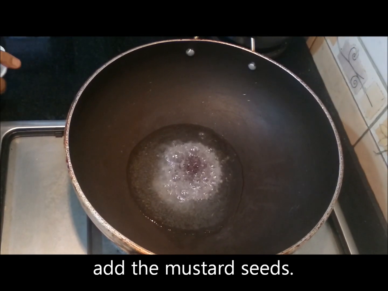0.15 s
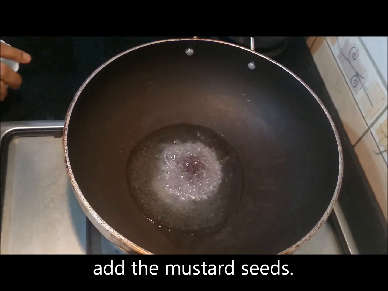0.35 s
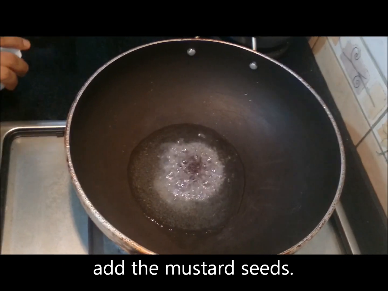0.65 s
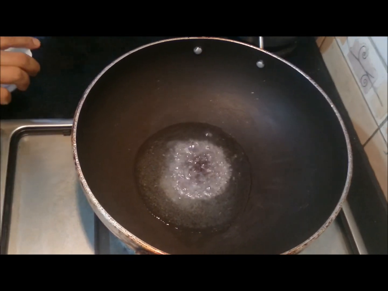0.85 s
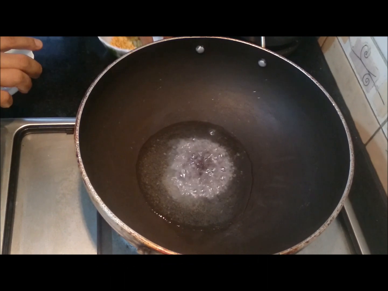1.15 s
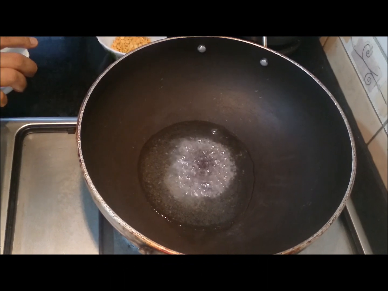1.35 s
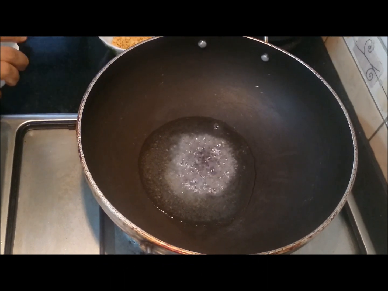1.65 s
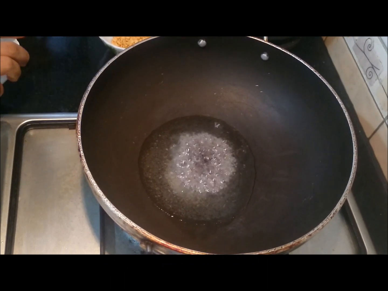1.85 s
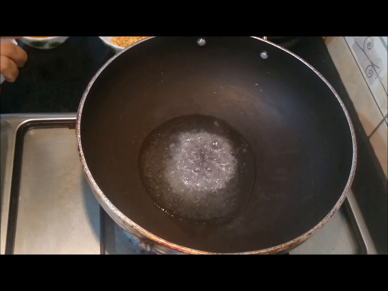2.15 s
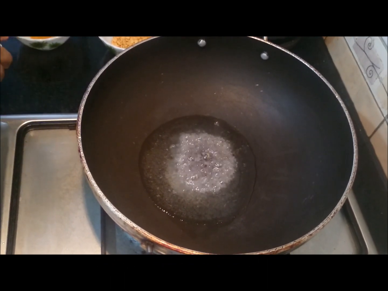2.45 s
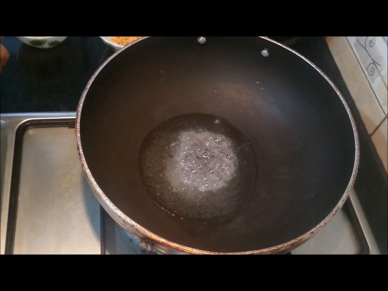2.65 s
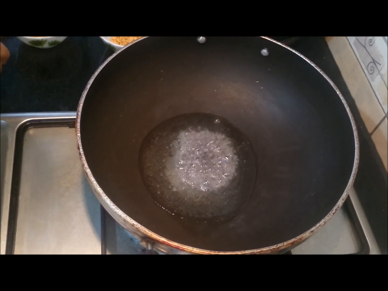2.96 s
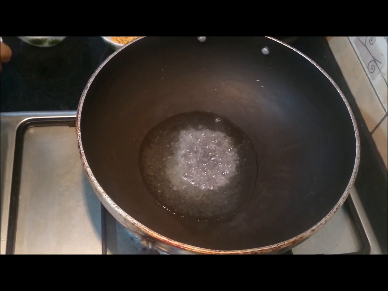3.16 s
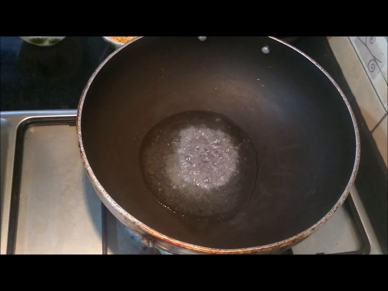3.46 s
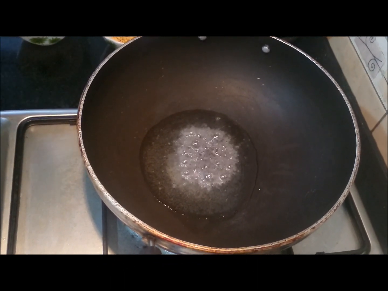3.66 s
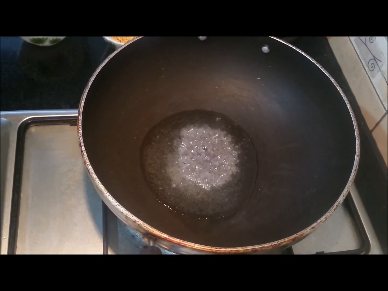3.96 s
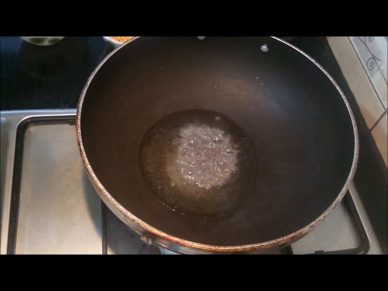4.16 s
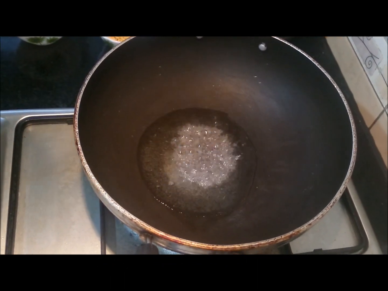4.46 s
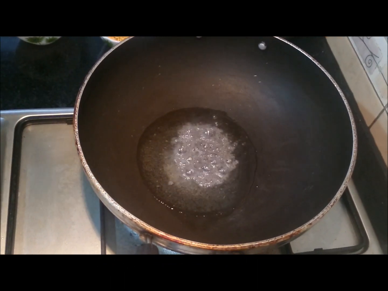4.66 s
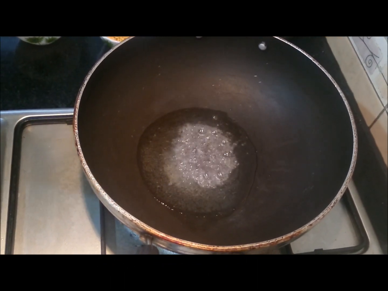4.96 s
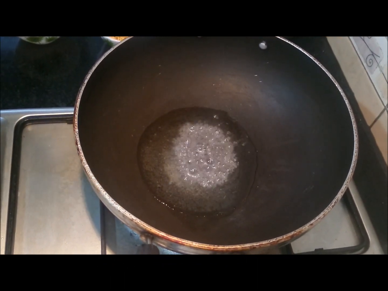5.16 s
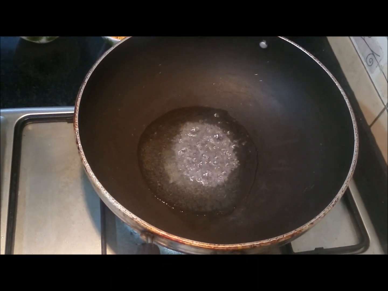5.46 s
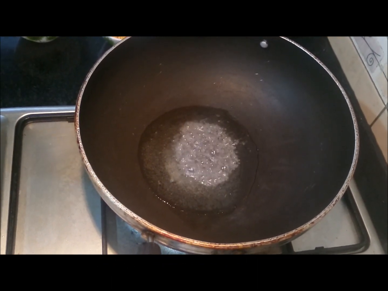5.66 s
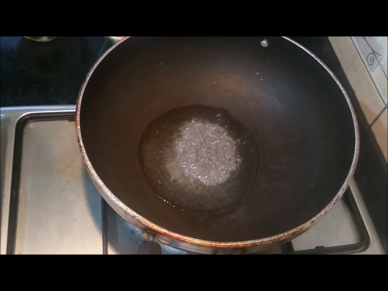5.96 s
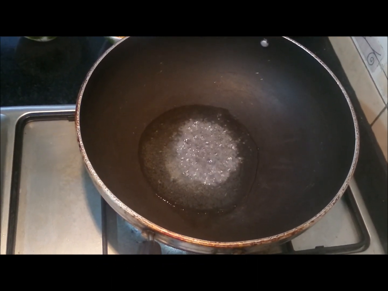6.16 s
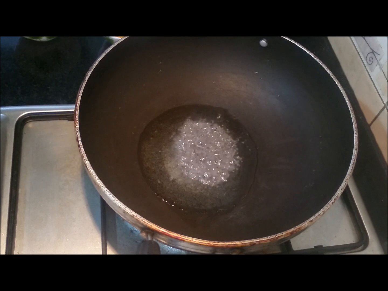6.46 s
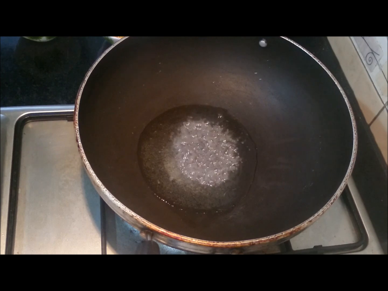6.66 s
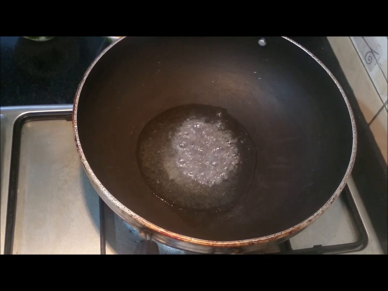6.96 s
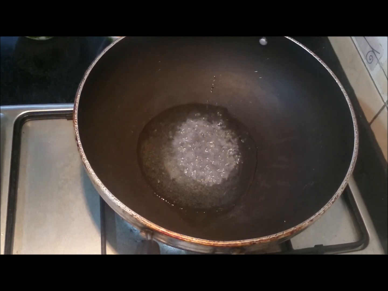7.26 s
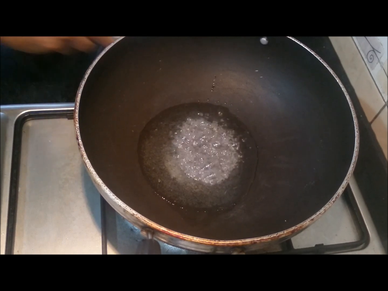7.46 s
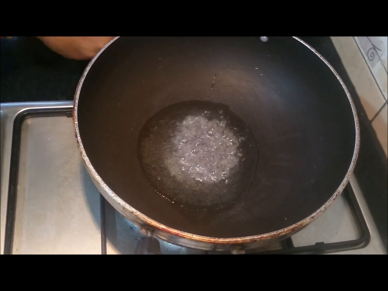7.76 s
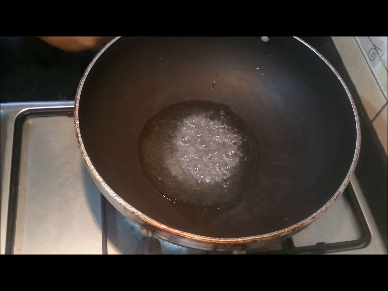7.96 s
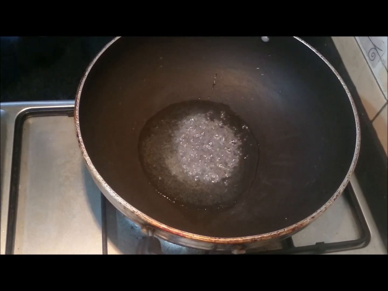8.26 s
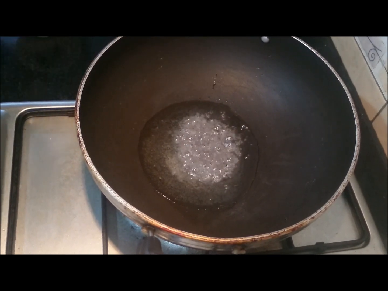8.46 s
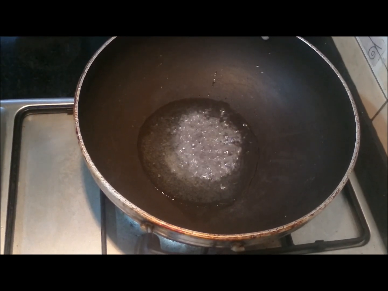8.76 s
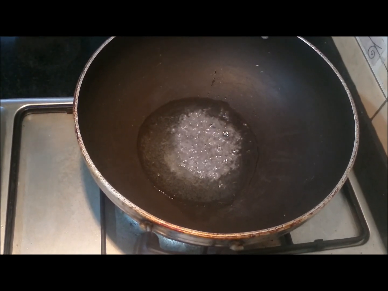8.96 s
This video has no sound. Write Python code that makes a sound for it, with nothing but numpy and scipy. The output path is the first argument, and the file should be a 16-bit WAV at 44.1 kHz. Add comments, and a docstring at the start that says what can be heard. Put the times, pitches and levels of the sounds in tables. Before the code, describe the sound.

A fine, even sizzle of hot oil runs throughout, over a very quiet, low gas-burner rumble. From 0 to 3 s mustard seeds pop only now and then, mostly soft, with stronger ones near 1.2 and 2.3 s. Fingers rub the hand-held camera around 0.7-1.4 s, 1.8-2.2 s and 2.6-3.5 s, the last slip sharpest, near 3.2 s, with a tiny squeak; hand shifts thud dully. At 3.5-3.8 s a cluster of crisp cracks arrives. A hard, bright double pop at about 4.4 s spits a brief hiss of boiling droplets. From 5 s pops come rapidly, with another hard snap at 5.4 s, each rattling round the ringing steel bowl with a short kitchen echo. Around 7.2-7.8 s they are strong and frequent; the sizzle rises, small bubbles plink between, and by 8.6-9 s the popping is nearly continuous and the frying loudest.

```python
"""A soft, even sizzle in a wok of hot oil, and mustard-seed pops that come faster and harder, each rattling round the bowl.
Pops are resonant noise bursts with rising plinks, cracks and thuds; sizzle is dense random ticks plus hiss.
Cracks throw hissing droplets, and small bubbles plink between the pops; steel modes ring after all of these.
A gas burner murmurs as shaped noise. Early on fingers rub a hand-held camera (swelling and jolting noise),
the hand's shifts rumble dully, and its two microphones colour the sound differently."""
import sys
import numpy as np
from scipy import signal
from scipy.fft import rfft, irfft, next_fast_len
from scipy.io import wavfile
from scipy.ndimage import map_coordinates

SR = 44100
rng = np.random.default_rng(int(sys.argv[2]) if len(sys.argv) > 2 else 0)


def pcm_store(signal):
    """Save signal as 16-bit PCM."""
    levels = np.round(np.clip(np.atleast_2d(signal), -1, 1) * 32767)
    wavfile.write(sys.argv[1], SR, levels.astype(np.int16).T)


N = 402191

# seeds that burst loudly: t/s, ring level before trim/dB, ring pitch/Hz, ring sharpness Q, crack level before trim/dB
SEED_POPS = [(0.136, -45, 2530, 1.9, -52), (0.237, -31, 4600, 11, -57), (0.256, -30, 3220, 0.64, -58),
             (0.482, -44.5, 6500, 3.6, -48), (0.756, -36.5, 2780, 0.85, -43.5),
             (0.905, -41, 6740, 1.8, -61), (0.964, -38.5, 4710, 3.6, -59), (1.193, -22, 5000, 2.2, -60),
             (1.476, -48, 5150, 7.9, -60), (1.564, -38.5, 4380, 5.6, -47), (1.979, -33.5, 3530, 1.3, -47),
             (2.284, -19, 6650, .9, -50), (2.367, -31, 4830, 2.7, -43), (2.398, -40.5, 5400, 1.6, -43),
             (2.556, -39, 7170, 1.3, -70), (2.895, -34, 6400, 0.63, -61), (3.193, -36.5, 7840, 3.6, -63),
             (3.418, -43, 4340, 1.8, -67), (3.5163, -30, 2990, 1.6, -20), (3.586, -21.5, 11800, 1.4, -22),
             (3.690, -31.5, 2790, 1.5, -27), (3.722, -31.5, 4350, 3.6, -59), (3.815, -24, 3770, 2.5, -19),
             (4.181, -27.5, 4500, 1.9, -39), (4.374, -13, 12060, 2.4, -19.5), (4.391, -34, 2640, 1.3, -44),
             (4.425, -42, 10800, 1.3, -15.5), (4.597, -32, 3900, 1.6, -53), (4.8631, -50, 3800, 12, -29.5),
             (4.966, -45, 4700, 4.6, -49), (5.006, -31.5, 9400, 2.2, -30.5), (5.111, -30, 6200, 1.7, -50),
             (5.158, -21, 4770, 1.8, -53), (5.212, -28.5, 3090, 3, -39), (5.277, -29.5, 3800, 2.1, -36),
             (5.327, -22, 4920, 2.6, -48), (5.374, -14, 11950, 1.7, -14.5), (5.404, -35, 5750, 1.2, -50),
             (5.678, -29, 5180, 10, -17.5), (5.725, -27, 4940, 1.24, -38), (5.962, -36.5, 5140, 6.4, -50),
             (5.979, -27.5, 5440, 0.37, -51), (6.038, -20, 4170, 1.26, -52),
             (6.129, -24.5, 3440, 3.1, -26.5), (6.152, -32, 8650, 11, -17.5), (6.209, -18, 6040, 0.58, -45),
             (6.256, -28, 2970, 1.5, -36), (6.452, -32.5, 2900, 0.95, -59), (6.572, -29.5, 4400, 2.1, -55),
             (6.639, -23.5, 7400, 0.52, -53), (6.735, -30.5, 3980, 2.2, -38), (6.761, -33, 8410, 0.91, -62),
             (6.875, -31.5, 3600, 0.83, -33.5), (6.978, -33.5, 3870, .7, -62),
             (7.050, -23.5, 5560, 1.1, -25), (7.2247, -27.5, 4200, 3, -33), (7.229, -38, 3830, 2.4, -21),
             (7.289, -19.5, 4330, 5.4, -14.5), (7.444, -23.5, 5370, 0.76, -53),
             (7.475, -30, 5240, 5.9, -50), (7.55, -22, 5700, 0.75, -41), (7.613, -34.5, 2850, 2.8, -49),
             (7.6438, -20, 4240, 1.5, -27), (7.651, -21, 4460, 0.68, -24), (7.699, -28.5, 4430, 1.6, -55),
             (7.780, -31.5, 4140, .7, -57), (7.801, -33, 7400, 9.2, -22), (7.890, -23.5, 4130, 0.7, -49),
             (7.942, -24, 4000, 1.37, -49), (8.001, -37, 3770, 2.3, -27.5), (8.127, -21.5, 3230, 1.5, -21),
             (8.193, -29, 4300, 0.38, -51), (8.220, -28.5, 3060, 0.36, -53), (8.351, -29, 5560, 0.97, -44),
             (8.374, -26, 5600, .85, -52), (8.587, -28, 4700, 3.1, -20), (8.6175, -29.5, 4210, 7, -50),
             (8.650, -18, 4340, 1.2, -27), (8.662, -43, 4460, 2, -21.5), (8.7318, -30, 2800, 0.61, -55),
             (8.756, -27, 4040, 2, -56), (8.766, -30, 4500, 0.92, -52), (8.774, -25.5, 4180, 0.88, -55),
             (8.784, -15.5, 6200, 0.83, -50), (8.825, -26.5, 5010, 0.71, -25),
             (8.861, -25.5, 3220, 1.55, -31), (8.897, -33, 4910, 4.3, -58), (8.938, -21, 3730, 2.8, -28),
             (8.984, -35.5, 2600, 3.7, -41), (9.007, -27.5, 3400, 1.8, -23)]
# foam activity, sinking early on, then rising as the seeds heat up: t/s, level before trim/dB
FOAM_LEVEL = [(0, -42.5), (0.5, -47.5), (4.1, -48), (6.5, -45.5), (7.7, -41), (8.1, -42), (8.76, -37.5),
              (9.12, -41)]
# spectrum of the frying hiss: f/Hz, relative density/dB per Hz
FRYING_SPECTRUM = [(900, -30.5), (1900, -10), (3200, -2.5), (4500, 0), (5500, 0.5), (7500, -2), (10000, -4),
                   (15500, -7.5)]


def amp(db):
    """dB to amplitude ratio."""
    return 10 ** (np.asarray(db) / 20)


def unit(x):
    """x scaled to rms 1."""
    return x / np.sqrt(np.mean(x ** 2) + 1e-20)


def along(points, hz):
    """(f/Hz, value) points interpolated on a log-frequency axis."""
    f, v = np.transpose(points)
    return np.interp(np.log(hz + 1), np.log(f + 1), v)


def curve(rows):
    """(t/s, value) rows interpolated to one value per sample."""
    return np.interp(np.arange(N) / SR, *np.transpose(rows))


def wobble(rate_hz):
    """Smooth random curve with rate_hz knots a second."""
    knots = rng.standard_normal(int(N * rate_hz / SR) + 4)
    return map_coordinates(knots, [np.arange(N) * rate_hz / SR])


def fade(t, t60_s):
    """Amplitude falling 60 dB in t60_s."""
    return np.exp(-np.log(1000) * t / t60_s)


def filtered(x, response):
    """x times a complex response of frequency."""
    n = x.shape[-1]
    padded = next_fast_len(n + 4096)
    f = np.fft.rfftfreq(padded, 1 / SR)
    return irfft(rfft(x, padded) * response(f), padded)[..., :n]


def resonance(f, hz, q):
    """Causal band-pass with steep skirts: one resonator applied twice."""
    single = 1j * f * hz / q / (hz * hz - f * f + 1j * f * hz / q)
    return single ** 2


def coloured(x, points):
    """x with the given gain curve over frequency, at rms 1."""
    return unit(filtered(x, lambda f: amp(along(points, f))))


def add(track, start_s, sound):
    """Mix a sound into the track at start_s."""
    part = track[:, max(round(start_s * SR), 0):][:, :sound.shape[1]]
    part += sound[:, :part.shape[1]]


def swells(rows):
    """Amplitude with one smooth arch per (start/s, length/s, level/dB) row."""
    t = np.arange(N) / SR
    return sum(amp(db) * np.sin(np.pi * np.clip((t - s) / length, 0, 1)) ** 2 for s, length, db in rows)


def jolts(rows, t60_s):
    """Amplitude that jumps up and decays for each (t/s, level/dB) row."""
    kicks = np.zeros(N)
    for s, db in rows:
        kicks[round(s * SR)] += amp(db)
    return signal.lfilter([1], [1, -fade(1 / SR, t60_s)], kicks)


def kitchen(rise_s=0.0027):
    """Room response at two microphones: noise whose frequencies decay at different speeds."""
    # reverberation: f/Hz, t60/s
    room_t60 = [(300, 0.87), (2000, 0.4), (5500, 0.46), (9000, 0.37), (15000, 0.25)]
    size = SR * 2 // 5
    hz, age, z = signal.stft(rng.standard_normal((2, size)), SR, nperseg=256)
    decayed = z * fade(age, along(room_t60, hz)[:, None])
    tail = signal.istft(decayed, SR, nperseg=256)[1][:, :size]
    return tail * (1 - np.exp(-np.arange(size) / SR / rise_s))


def echoes(room, rise_s, burst_t60_s, wok_db, wok_t60_s, room_db, shared, spiky=0.45):
    """A burst as each microphone hears it: blast, rattle round the bowl, then room."""
    t = np.arange(SR // 12) / SR
    shared = np.clip(shared, 0, 1)  # power fraction of the blast common to both microphones
    common = np.sqrt(shared) * rng.standard_normal(len(t))
    blast = common + np.sqrt(1 - shared) * rng.standard_normal((2, len(t)))
    rattle = amp(wok_db) * rng.standard_normal((2, len(t))) * fade(t, wok_t60_s)
    near = blast * fade(t, burst_t60_s) + rattle
    # the curved wall focuses some reflections and scatters others
    knots = t[::SR // 1500]
    focus = np.interp(t, knots, np.clip(rng.standard_normal(len(knots)), -2, 2))
    near *= np.exp(spiky * (focus - spiky / 2))
    path = amp(room_db) * room
    add(path, 0, near * (1 - np.exp(-t / rise_s)))
    return path


def burst(path, hz, q):
    """The path through one resonance, with the energy of 10 ms at rms 1."""
    x = filtered(path, lambda f: resonance(f, hz, max(q, .2)))
    return x * np.sqrt(SR / 100 / np.sum(x ** 2, axis=1, keepdims=True))


def sizzle(level_db=-1.5, rate_hz=900, spread_db=5, hiss_db=-3, spots=5):
    """Hundreds of tiny foam bubbles burst each second, over the hiss of those too small to tell apart."""
    sizes_db = spread_db * np.minimum(rng.exponential(size=N), 4)
    ticks = (rng.random(N) < rate_hz / SR) * amp(sizes_db)
    spot = rng.integers(0, spots, N)
    crackle = np.zeros((2, N))
    for k in np.unique(spot):  # each spot of foam has its own path to the microphones
        path = echoes(kitchen(), rise_s=0.0012, burst_t60_s=0.013, wok_db=-5.5, wok_t60_s=0.1,
                      room_db=-18.0, shared=0.76)
        crackle += signal.fftconvolve((ticks * (spot == k))[None], path, axes=1)[:, :N]
    foam = unit(crackle) + amp(hiss_db) * rng.standard_normal((2, N))
    waver_db = .6 * wobble(9)
    return amp(level_db + curve(FOAM_LEVEL) + waver_db) * coloured(foam, FRYING_SPECTRUM)


def burner(level_db=-57, drone_db=-68, drone_hz=94, flame_db=-63, flame_hz=850, flame_q=7.1):
    """The gas flame rumbles, with a low drone and a hollow resonant rush under the wok."""
    # rumble spectrum: f/Hz, relative density/dB per Hz
    rumble_spectrum = [(12, -86), (20, 2), (32, -29), (92, -12.5), (129, -24), (230, -17.5), (330, -24),
                       (493, -18), (627, -19.5), (847, -17), (994, -22.5), (1120, -23), (1260, -26.5),
                       (1430, -21.5), (2400, -85), (3120, -71), (5280, -120)]
    # left-right correlation: f/Hz, likeness (0 to 1)
    likeness = [(30, 0.051), (60, 0.17), (130, 0.85), (290, 0.66), (640, 0.47), (1400, 0.17)]
    a, b, c = rng.standard_normal((3, N))

    def turn(f):
        """Mid/side mixing angle that gives the likeness."""
        return np.arccos(np.clip(along(likeness, f), -1, 1)) / 2

    mid = filtered(a, lambda f: np.cos(turn(f)))
    side = filtered(b, lambda f: np.sin(turn(f)))
    flutter_db = .8 * wobble(8)
    rumble = coloured(np.array([mid + side, mid - side]), rumble_spectrum) * amp(flutter_db)
    drone = unit(filtered(c, lambda f: resonance(f, drone_hz, 2.8)))
    rush = unit(filtered(rng.standard_normal((2, N)), lambda f: resonance(f, flame_hz, flame_q)))
    return amp(level_db) * rumble + amp(drone_db) * drone + amp(flame_db) * rush


def grip(level_db=-2, tremor_db=-65, tremor_swing_db=4):
    """Hand shifts and a continuous slight tremor reach the microphones as a dull rumble."""
    # hand shifts: start/s, length/s, peak level before trim/dB
    hand_shifts = [(0.24, 0.41, -57.5), (0.68, 0.16, -49.5), (4.34, 0.47, -55), (7.5, 0.44, -50)]
    noise = rng.standard_normal(N) + .5 * rng.standard_normal((2, N))
    tremor = amp(tremor_db + tremor_swing_db * wobble(5))
    motion = amp(level_db) * swells(hand_shifts) + tremor
    # f/Hz, relative density/dB per Hz
    return motion * coloured(noise, [(10, 4.5), (30, 1), (55, -5), (170, -14.5), (400, -30), (1000, -70)])


def blips(level_db=-2, grows=1.7, spread_db=2.5, pitch_hz=5200, scatter=0.3, q=4, count=40):
    """Small bubbles plink between the pops: denser towards the end, louder when the foam is louder."""
    track, heat_db = np.zeros((2, N)), curve(FOAM_LEVEL)
    plink_db = level_db + heat_db.min() + grows * (heat_db - heat_db.min())
    draws = np.clip(rng.standard_normal((count, 2)), -2, 2)
    for place, (size, pitch) in zip(rng.random(count), draws):
        at = int(np.cbrt(place) * (N - 1))  # the cube root crowds them late
        path = echoes(kitchen(), rise_s=0.0014, burst_t60_s=0.015, wok_db=-23, wok_t60_s=.07,
                      room_db=-31, shared=0.75)
        blip = burst(path, pitch_hz * np.exp(scatter * pitch), q)
        add(track, at / SR, amp(plink_db[at] + spread_db * size) * blip)
    return track


def plink(hz, q, rise_s=0.0015, t60_s=0.014, climb=0.29, climb_s=0.0026):
    """A closing bubble's short rising note; the sharper the pop's ring, the louder it is."""
    t = np.arange(SR // 25) / SR
    pitch_hz = hz * np.exp(climb * (.5 - np.exp(-t / climb_s)))
    tone = np.sin(2 * np.pi * np.cumsum(pitch_hz) / SR)
    note = tone * (1 - np.exp(-t / rise_s)) * fade(t, t60_s)
    # energy of 10 ms at rms 1, before the sharpness weight
    return q / (q + 1) * note * np.sqrt(SR / 100 / np.sum(note ** 2))


def push(path, width_s=0.000095, rebound=0.98, echo_db=-24):
    """A pressure pulse, weaker suction and faint echoes, at rms 1 over the first 10 ms."""
    u = np.arange(SR // 100) / SR / width_s
    pulse = (1 - rebound * u) * np.exp(-u)
    heard = amp(echo_db) * path
    heard[:, SR // 2000] += 1  # direct pulse at 0.5 ms
    x = signal.fftconvolve(heard, pulse[None], axes=1)[:, :path.shape[1]]
    return x / np.sqrt(np.mean(x[:, :len(u)] ** 2))


def pops(ring_db=0.06, crack_db=1, crack_hz=10500, crack_q=0.45):
    """Steam escapes: the oil cavity swells and rings, the husk cracks, the hardest pops thump the air."""
    thud_db, thud_grows = -27, 1 + 1.24  # thud at full force; dB of thud per dB of force
    full_force_db, ring_force_db = -12.5, -1.5  # reference force; weight of the ring in the force
    snap_s, snap_db = 0.0006, 9.5  # sharp front of the husk's split: delay, height re initial blast
    plink_db = -6  # re ring, before the sharpness weight
    pans_db = 0.9 * rng.standard_normal(len(SEED_POPS))  # left-right scatter across the pool
    track = np.zeros((2, N))
    for (s, ring, hz, q, crack), pan_db in zip(SEED_POPS, pans_db):
        room = kitchen()
        soft = echoes(room, rise_s=0.0018, burst_t60_s=0.013, wok_db=-12.0, wok_t60_s=0.062,
                      room_db=-25.0, shared=0.67)
        sharp = echoes(room, rise_s=0.00012, burst_t60_s=0.016, wok_db=-9.0, wok_t60_s=0.094,
                       room_db=-19, shared=0.26)
        add(sharp, snap_s, amp(snap_db) * np.ones((2, 1)))
        force = np.hypot(amp(crack), amp(ring + ring_force_db)) / amp(full_force_db)
        pop = amp(ring + ring_db) * burst(soft, hz, q)
        add(pop, 0, amp(ring + plink_db) * plink(hz, q)[None])
        pop += amp(crack + crack_db) * burst(sharp, crack_hz, crack_q)
        pop += amp(thud_db) * force ** thud_grows * push(sharp)
        add(track, s, pop * amp([[pan_db / 2], [-pan_db / 2]]))
    return track


def spatter(sputter_db=2.5):
    """Cracks fling droplets that hiss on bare steel; a hard double pop's oil flashes to steam and boils off."""
    # spectrum of the thrown oil: f/Hz, relative density/dB per Hz
    spray_spectrum = [(1500, -34), (2550, -17), (2850, 6.5), (3200, -10), (5500, -0.5), (7400, 1),
                      (8100, 5), (9000, 1), (11000, -3), (15500, 2)]
    droplet_db, droplet_t60_s = -26.5, 0.6  # level re crack
    splash_s, flash_db, flash_t60_s = 4.435, -27, 0.18
    boil_s, boil_db = 0.35, -33.5
    droplets = jolts([(s, crack + droplet_db) for s, ring, hz, q, crack in SEED_POPS], droplet_t60_s)
    flash = jolts([(splash_s, flash_db)], flash_t60_s)
    splash = flash + swells([(splash_s, boil_s, boil_db)])
    hiss = droplets * coloured(rng.standard_normal((2, N)), FRYING_SPECTRUM)
    hiss += splash * coloured(rng.standard_normal((2, N)), spray_spectrum)
    return hiss * amp(sputter_db * wobble(57))


def bowl(x, direct_db=-1):
    """The steel wok rings at its own resonances after each burst inside it."""
    # steel modes: f/Hz, width/Hz, peak gain/dB
    steel_modes = [(2267, 17.6, 4.5), (2455, 330, -3.5), (3405, 61, -3), (3730, 56, -3), (4100, 8.9, -6.5),
                   (5010, 96, -7.5), (5340, 96, -10), (7800, 40, -4), (9930, 76, -10), (13300, 58, -18),
                   (13400, 60, -19)]

    def ringing(f):
        """Summed response of the modes."""
        return sum(amp(db) * 1j * f * width / (hz * hz - f * f + 1j * f * width)
                   for hz, width, db in steel_modes)

    return filtered(x, lambda f: amp(direct_db) + ringing(f))


def fingers(level_db=-2, grit_db=3.0, slip_t60_s=0.14, squeak_db=-51, squeak_hz=3750, squeak_s=0.089):
    """Skin rubs and slips on the camera body, which colours the friction; the last slip squeaks."""
    # fingertip catches and slips: t/s, level before trim/dB
    finger_slips = [(0.368, -49), (0.74, -50.5), (0.996, -44), (1.134, -41), (1.315, -42), (1.827, -41.5),
                    (1.933, -42.5), (2.777, -46), (3.179, -39), (3.244, -32)]
    # fingers slide: start/s, length/s, peak level before trim/dB
    finger_strokes = [(0.72, 0.68, -43.5), (1.76, 0.45, -53), (2.64, 0.59, -50.5), (3.13, 0.43, -48)]
    # camera body: f/Hz, relative density/dB per Hz
    body_spectrum = [(250, -63), (500, -1), (900, -2), (1350, 9), (1750, 5), (2200, -0.5), (3700, -6.5),
                     (7000, -42)]
    force = amp(level_db) * (swells(finger_strokes) + jolts(finger_slips, slip_t60_s))
    friction = coloured(rng.standard_normal((2, N)), body_spectrum)
    rustle = force * amp(grit_db * wobble(300)) * friction
    squeak = unit(filtered(rng.standard_normal(N), lambda f: resonance(f, squeak_hz, 75)))
    return rustle + swells([(finger_slips[-1][0], squeak_s, squeak_db)]) * squeak


def scene():
    """Bursts inside the ringing bowl, plus foam, handling and flame."""
    return bowl(pops() + blips() + spatter()) + sizzle() + fingers() + grip() + burner()


def microphone(x, points, size=4096):
    """x through a causal minimum-phase filter with the given gains."""
    cepstrum = irfft(np.log(amp(along(points, np.fft.rfftfreq(size, 1 / SR)))))
    # fold the cepstrum onto positive time
    cepstrum[1:size // 2] *= 2
    cepstrum[size // 2 + 1:] = 0
    impulse = irfft(np.exp(rfft(cepstrum)))
    return signal.fftconvolve(x, impulse)[:N]


def record(dry, top_hz=15900):
    """Each microphone port adds its resonances; peaks clip at 0.85; nothing is kept from top_hz up."""
    # port responses: f/Hz, gain/dB
    left_gain = [(25, -9), (100, 3), (400, -4.5), (850, 1.5), (1200, 2), (4000, -0.5), (5300, 4.5),
                 (6500, 2), (8500, 4.5), (10000, 2.5), (11000, -4), (12700, 2), (15500, -7.5)]
    right_gain = [(25, 11), (100, 4.5), (600, -2.5), (850, 5.5), (1100, 3), (3500, -1.5), (4500, 1),
                  (5400, 9.5), (6500, 2), (8000, -6), (10500, -11), (12500, -7), (14500, -5.5),
                  (15500, -2.5)]
    pair = np.array([microphone(dry[0], left_gain), microphone(dry[1], right_gain)])
    clipped = np.clip(pair, -.85, .85)
    return filtered(clipped, lambda f: f < top_hz)


dry = scene()
out = record(dry)
pcm_store(out)
```